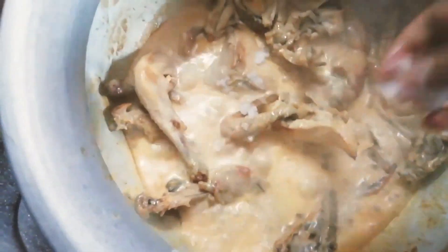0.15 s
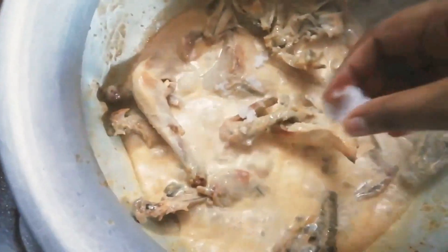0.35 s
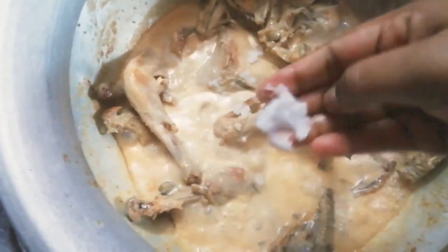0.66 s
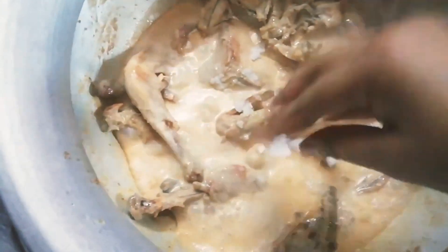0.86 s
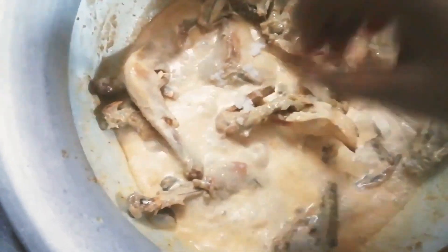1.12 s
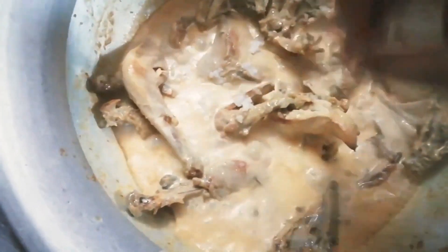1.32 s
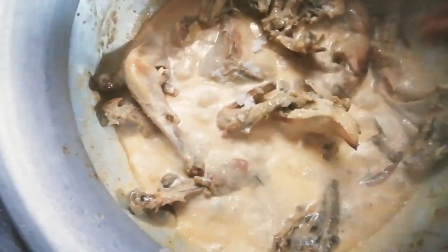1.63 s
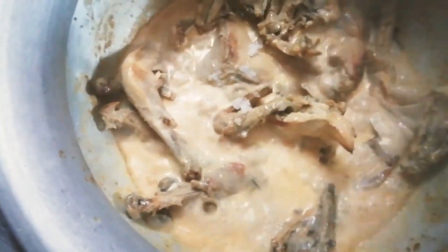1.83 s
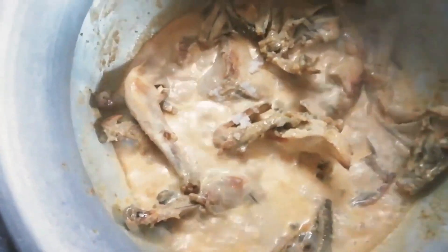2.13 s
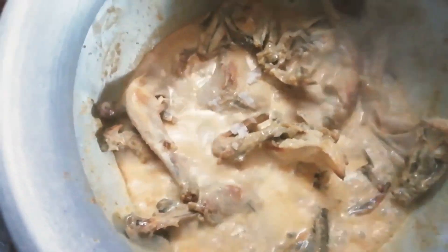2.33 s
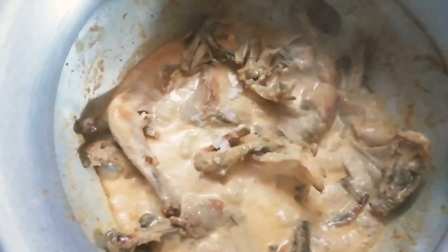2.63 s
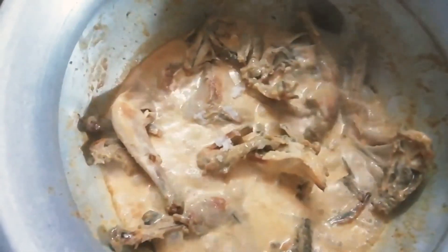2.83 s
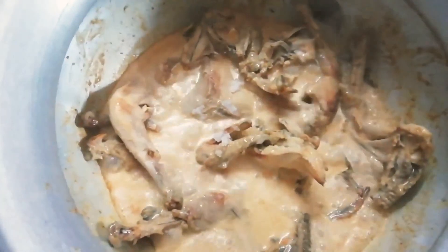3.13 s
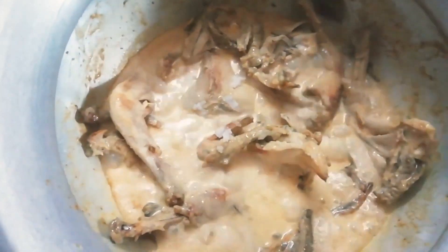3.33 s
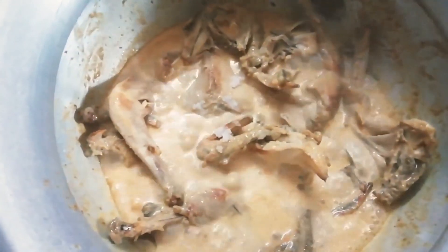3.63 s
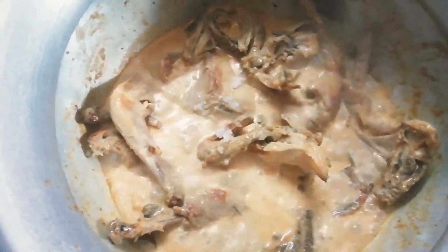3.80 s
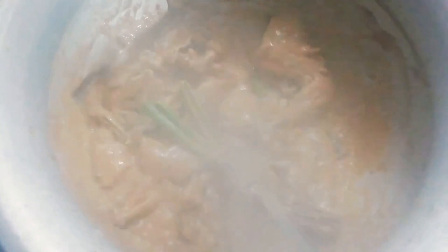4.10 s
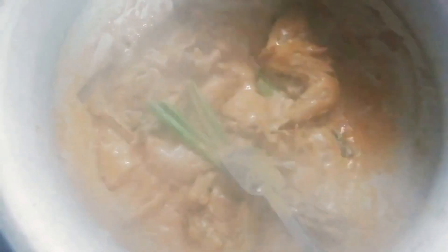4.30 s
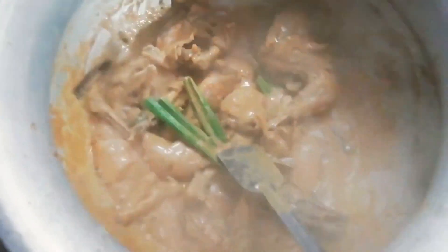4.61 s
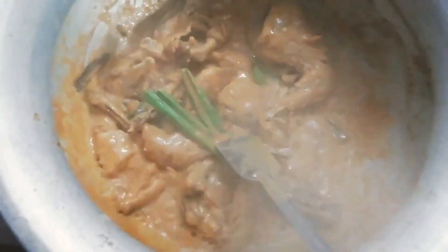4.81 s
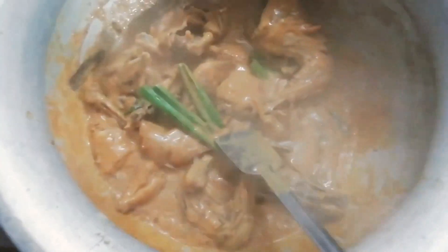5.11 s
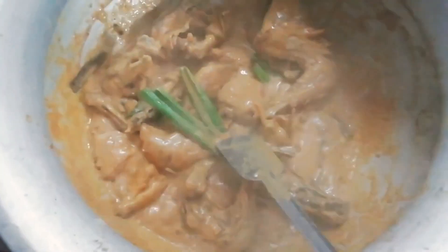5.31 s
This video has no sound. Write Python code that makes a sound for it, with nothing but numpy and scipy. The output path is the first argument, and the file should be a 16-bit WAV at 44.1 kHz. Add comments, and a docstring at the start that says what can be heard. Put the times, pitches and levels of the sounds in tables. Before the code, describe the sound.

Very close stereo sound of stew in a wide pot. First a quiet simmer, with rounded plops and pops rising in pitch, crackly bubble runs and sharp high spits over thin fizz. A short gap holds only faint insect whine and low room rumble. Then a soft thump and a hard boil, steady bright frying-like hiss with fewer distinct pops, until the end.

```python
"""Metal pot of thick gravy, two close microphones: bubbles pop and spit over fine fizz and burner roar.
The pot fades out for a moment, leaving centred night insects and room rumble; a low thump, then a hard boil.
Bursts are rising-pitch rings with a crack and noise splatter; splutters are runs of small rings.
Fizz is clumped random grains plus noise; roar, rumble and night are coloured noise with narrow lines."""
import sys
import numpy as np
from scipy import signal
from scipy.fft import rfft, irfft
from scipy.io import wavfile
from scipy.ndimage import uniform_filter1d, map_coordinates

SR = 44100
rng = np.random.default_rng(int(sys.argv[2]) if len(sys.argv) > 2 else 0)


def persist_wave(psi):
    """Save psi, clipped to +-1, as 16-bit WAV."""
    counts = np.round(np.clip(psi, -1, 1) * 32767).astype(np.int16)
    wavfile.write(sys.argv[1], SR, np.atleast_2d(counts).T)


N = 240481

# Night band spectrum: hz, density_db_per_hz (relative)
NIGHT_SPECTRUM = [(900, -60), (1500, -15.5), (3100, -17.5), (3600, -19.5), (5800, -22), (6500, -11.5),
                  (7300, 2), (7600, -4), (8900, -6), (9600, -16.5), (10800, -16), (11700, -25),
                  (15500, -24.5)]
# Room rumble spectrum: hz, density_db_per_hz (relative)
RUMBLE_SPECTRUM = [(12, -58), (20, -7), (91, -9), (129, -6.5), (151, -14.5), (354, -9.5), (481, -15.5),
                   (517, -11), (619, -19), (1500, -27.5), (1950, -78), (3300, -120)]
NIGHT_RMS_DB, RUMBLE_RMS_DB = -53, -58
# Insect lines: hz, width_hz, level_db
INSECT_LINES = [(7110, 7.9, -65.5), (7490, 39, -64.5)]
# Thin steady whine: hz, width_hz, level_db
WHINE_LINES = [(6002, 4, -80)]
# Appliance drone: hz, width_hz, level_db (relative to the drone's level)
DRONE_LINES = [(82.6, 21.4, -3), (122.9, 24, -4)]
# Drone swelling and sinking: time_s, level_db
DRONE_LEVELS = [(0, -58), (.23, -65.5), (.59, -55.5), (1.05, -60), (1.29, -61), (2.14, -55.5), (2.3, -67),
                (2.6, -54), (2.85, -78.5), (2.99, -55), (3.22, -65), (3.55, -54), (3.85, -65), (4.01, -58),
                (5.45, -64)]
# Low bumps as the hand-held microphones are jostled: start_s, peak_db, pitch_hz
JOSTLES = [(0.047, -47, 88.8), (0.139, -44, 56), (0.938, -44, 79.4), (1.941, -48, 63.5), (2.33, -48, 57.5),
           (2.411, -49, 37.7), (2.971, -43.5, 51.4), (3.5, -47, 71)]
THUMP_S, THUMP_DB, THUMP_SETTLE_S = 4.2078, -30.7, .036

# Simmer, then hard boil; fizz level in each: time_s, level_db
SPELL_LEVELS = [
    [(0, -52.5), (.45, -55), (1.35, -51.5), (1.43, -53), (1.5, -50.5), (1.6, -55), (1.9, -52),
     (1.97, -52.5), (2.1, -52.5), (2.6, -54.5), (3.89, -52)],
    [(4.208, -42), (4.266, -42.5), (4.35, -39), (4.41, -40.5), (4.49, -39), (4.56, -40), (4.91, -39.5),
     (4.98, -41.5), (5.09, -38.5), (5.21, -42), (5.24, -39), (5.34, -40.5), (5.453, -39.5)],
]
FADE_S, FADE_DB_PER_S = 3.885, 700  # simmer's fizz and roar fade from here
# Burner roar spectrum in each spell: hz, density_db_per_hz (relative)
ROAR_SPECTRA = [(12, -30), (20, 10), (86, -12), (128, -34), (151, 3.5), (251, 0.5), (295, 7.5), (577, -5),
                (640, -27), (700, -2.5), (910, -24), (1540, -120)], [(12, -43), (20, -18), (112, -19),
                (201, 1), (266, -5.5), (309, 2.5), (490, -7), (700, -25), (910, -38), (1540, -120)]
# Roar swelling with the gurgling: time_s, level_db
ROAR_LEVELS = [(0, -54.5), (.15, -57.5), (3.87, -54.5), (4.2, -54.5), (5.45, -54)]
# Fizz spectrum in each spell: hz, density_db_per_hz (relative)
FIZZ_SPECTRA = [(320, -71), (550, -14), (813, 3), (1050, -1.5), (1960, -5), (2350, -4.5), (5750, -5.5),
                (8150, 1.5), (9640, -5.5), (10300, -38), (10900, -27), (12200, -16), (13300, -23),
                (15500, -58)], [(320, -42), (550, -21), (660, -13.5), (791, -6.5), (1080, -16),
                (1380, -8.5), (1660, -10), (2290, -6.5), (4930, -6), (6520, -9), (7930, 1), (8860, -3.5),
                (10900, -18), (14500, -27.5), (15500, -50)]
GRAINS_PER_S, GRAIN_SPREAD_DB, CLUMP_DB = (2500, 6000), (1.5, 2), (4, 2.5)  # in each spell
# Left-right likeness of fizz and roar: hz, likeness (0 to 1)
LIKENESS = [(100, 0.96), (350, 0.96), (700, 0.059), (1400, 0.66), (2200, 0.072), (3000, 0.0081)]
# Left-right balance of fizz and roar: hz, left_right_db
BALANCE = [(60, 4), (110, 1), (200, -0.5), (380, -0.5), (700, 3.5), (1290, -1), (2380, 6), (4400, 1.5),
           (8120, -1), (15000, 3)]

# Ragged runs of small bubbles: start_s, length_s, pitch_hz, spread_octaves (each way), level_db, left_right_db
RUNS = [(0.031, 0.063, 1400, 1.05, -55, 2), (0.267, 0.02, 1190, 0.54, -57, 0),
        (0.745, 0.071, 1200, 0.76, -60, 3), (0.9, 0.087, 2780, 0.31, -59, 9),
        (1.058, 0.031, 2940, 0.22, -61, 17), (1.103, 0.02, 2500, 0.36, -57, 22),
        (1.268, 0.032, 2600, 0.98, -56, 4), (1.292, 0.062, 4600, 0.45, -56.5, 12),
        (1.313, 0.029, 2620, 0.53, -56, 16), (1.329, 0.013, 5500, 0.49, -54, 6),
        (1.354, .055, 2310, 0.86, -58, 3), (1.369, 0.0088, 4000, 0.49, -52, 3),
        (1.467, 0.061, 3100, 0.38, -55, 2), (1.497, .008, 3300, .03, -50, 10),
        (1.639, 0.056, 2540, 1.05, -56.5, 7), (1.936, 0.05, 2760, 0.92, -51, 8),
        (1.958, 0.011, 3040, 1.1, -52, 6), (1.969, 0.0087, 3450, 0.81, -53.5, 12),
        (2.072, 0.056, 1550, 0.88, -60.5, 2), (2.158, 0.012, 1720, 0.65, -50.5, 1),
        (2.496, .055, 2370, 0.21, -56, 7), (2.601, 0.048, 2320, 0.68, -59.5, 5),
        (2.806, 0.024, 2390, 1.73, -46, 2), (2.812, 0.0035, 4130, 1.3, -51, 2),
        (2.944, 0.0075, 3680, 0.32, -58, 8), (3.636, 0.04, 1800, 0.93, -52.5, -1),
        (3.655, 0.0037, 5500, 1.5, -50.5, 9), (3.769, 0.036, 1200, 0.67, -55, -3),
        (5.42, 0.03, 3030, 0.73, -54, 19)]
CLIMB = .35  # share of a run's pitch spread that climbs as the bubbles shrink
PLOP_HZ, PLOP_DB = 340, 9.5  # nominal pitch; peak over the run's level

# Clearest bursts: start_s, level_db, pitch_hz, left_right_db, splatter_db, crack_db (last two re level_db)
CLEAR_POPS = [(0.021, -35, 1480, 3, -15, -12), (0.042, -38.5, 1070, 4, -14, -18),
              (0.066, -40, 1480, 0, -16, -2), (0.129, -43, 1450, 1, -12, -15),
              (0.141, -34, 1520, 0, -10, -17), (0.2, -45, 1080, 4, -6, -14),
              (0.274, -42, 1390, 2, -12, -12), (0.297, -44.5, 2880, 10, -20, -1),
              (0.304, -46.5, 880, 1, -12, -12), (0.504, -46, 1230, 1, 4, -16),
              (0.58, -43, 1350, 1, -10, -16), (0.614, -52, 2000, 5, -7, 8), (0.617, -47, 3900, 1, -1, -6),
              (0.678, -51, 2570, 8, 1, 11), (0.693, -49, 2520, 4, -2, 7), (0.735, -45, 2700, 6, -18, -7),
              (0.812, -49, 990, 3, -8, -6), (0.719, -47, 1090, 4, -6, -2), (0.769, -48, 850, 2, -12, -8),
              (0.872, -46, 1140, 1, -21, -12), (0.906, -45.5, 2600, 1, -6, 10),
              (0.99, -34.5, 3570, 8.5, -5, -3), (0.9905, -34, 7700, -1, -1, -12),
              (0.9967, -33, 1390, 0, -15, -20), (1.0633, -37, 3080, 9, -13, -16),
              (1.0942, -34, 1820, -1, -9, -14), (1.1124, -23.5, 7490, 2, -6, -23),
              (1.113, -25.5, 4720, 9.5, -15, -12), (1.199, -43, 2340, 4, 0, -1),
              (1.213, -40, 6000, 5, -9, -7), (1.27, -42, 2710, 6, -17, -12), (1.2969, -46, 2610, 10, -9, 5),
              (1.297, -29, 7850, -3, -9, -7), (1.299, -45.5, 1360, 2, -10, -12),
              (1.31, -39, 8000, 0, -8, -12), (1.331, -34, 8100, -4, -2, -8), (1.354, -55, 1110, -2, 5, -4),
              (1.369, -55, 1310, 5, -10, 18), (1.396, -52, 3500, 4, -12, 8),
              (1.401, -44.5, 1810, 1, -10, 4), (1.488, -38, 7500, 2, -10, 2), (1.36, -42, 1770, -5, -5, 5),
              (1.389, -38, 1610, -1, -11, -2), (1.464, -39, 1410, 0, -2.5, 3), (1.469, -43, 3000, 8, -6, 3),
              (1.474, -30, 14500, 0, -20, -30), (1.475, -45.5, 1390, 6, -4, -8),
              (1.65, -41, 1330, 1, -2, 0), (1.672, -44, 4270, 3, -0.5, 4), (1.74, -42.5, 790, 5, -1.5, -5),
              (1.932, -38, 2270, 0, -1, 12.5), (2.007, -44, 4900, 3, -10, -7),
              (2.107, -46, 504, 3, -1, -17), (1.981, -48, 890, 8, -7, -10),
              (2.066, -45.5, 1040, 2, 4.5, -14), (2.17, -32, 3860, 6.5, -5, -16),
              (2.219, -46, 1580, 0, -5, 5), (2.231, -40.5, 3860, 2, -3, 6), (2.499, -47, 2200, 0, -26, 10),
              (2.723, -46.5, 1540, 4, -1, -12), (2.766, -43.5, 1610, 0, -22, -9),
              (2.795, -40, 900, -2, -5, -15), (2.806, -23.5, 3120, 9.5, -11.5, -8),
              (2.977, -39.5, 1970, 7, -7, -15), (3.131, -44, 1300, 0, -13, 3),
              (3.211, -42, 7600, -6, -3, -7), (3.271, -35.5, 3940, 2, -5.5, -0.5),
              (3.272, -37, 7940, 1, 0, -21), (3.324, -42, 1030, 2, 1, -7), (3.417, -33, 8000, -2, -16, -7),
              (3.637, -33.5, 1540, -7, -16, -21), (3.652, -42, 1390, 3.5, -1, -5),
              (3.7245, -29, 8600, 7, -7.5, -17), (3.857, -45, 4500, 3, -2, -8),
              (3.867, -34, 8100, -2, -5, -19), (4.2458, -37.5, 3580, 11, -13, -21),
              (4.3147, -25, 8050, -2.5, -22, -25), (4.343, -35.5, 2700, 4, -5, -15),
              (4.3668, -22.5, 7800, -9, -31, -16), (4.4972, -34, 7560, 2, -18, 4.5),
              (4.5487, -44.5, 1900, 11, 1, 5), (4.7723, -32.5, 4150, 5, -4.5, -1.5),
              (5.151, -31, 7950, 0, -2, -12), (5.2285, -28.5, 7830, 3, -9, -18),
              (5.274, -39.5, 2530, 5, -12, 7.5), (5.3928, -34.5, 2570, 5, -4, -19)]
# Small bursts in each spell: rate_per_s, low_hz, high_hz, level_db, spread_db (each way), mean left_right_db
SMALL_POP_RANGES = [(32, 675, 3600, -53.5, 7, 1.5), (70, 900, 5400, -50, 4, 3.5)]
SMALL_SPLATTER_DB, SMALL_CRACK_DB = -4, 1
# Pot wall echoes of each burst: delay_s, level_db
POT_ECHOES = [(.0025, -16), (.0045, -20)]
RISE_S = .0013  # first stir of a burst to the top of its blip
SPIT_HZ = 6600  # bursts above are spits of fat: longer ring, shorter splatter
PORT_HZ = 9300  # microphones lose treble above their port resonance; applied to bursts and runs
EDGE_HZ = 15430


def gain_of(db):
    """Amplitude ratio of a level in dB."""
    return 10 ** (np.asarray(db) / 20)


def unit_rms(x):
    """Scales x to rms 1."""
    return x / np.sqrt(np.mean(x ** 2) + 1e-20)


def add(mix, sound):
    """Adds sound at the head of mix, cut to fit."""
    count = min(mix.shape[-1], sound.shape[-1])
    mix[..., :count] += sound[..., :count]


def panned_gain(db, left_right_db):
    """Left and right gains, the dB difference split evenly."""
    return gain_of(db + np.array([[left_right_db], [-left_right_db]]) / 2)


def read(points, hz):
    """Interpolates a table over log frequency."""
    f, value = np.transpose(points)
    return np.interp(np.log(hz + 1), np.log(f + 1), value)


def coloured(x, points):
    """Filters x by the table's spectrum, at rms 1."""
    hz = np.fft.rfftfreq(x.shape[-1], 1 / SR)
    return unit_rms(irfft(rfft(x) * gain_of(read(points, hz)), x.shape[-1]))


def wander(knots_per_s, count):
    """Slow random curve of rms 1."""
    knots = rng.standard_normal(int(count / SR * knots_per_s) + 4)
    return unit_rms(map_coordinates(knots, [np.arange(count) / SR * knots_per_s], order=2))


def line(hz, width_hz):
    """Narrow wavering line of rms 1: a resonator on noise, shifted up to hz."""
    r = np.exp(-np.pi * width_hz / SR)
    noise = rng.standard_normal(N) + 1j * rng.standard_normal(N)
    slow = signal.lfilter([1], [1, -2 * r, r * r], noise)
    return unit_rms((slow * np.exp(2j * np.pi * hz * np.arange(N) / SR)).real)


def blip(hz, cycles, glide=0.093):
    """Bubble wall rings a few cycles, rising in pitch as the cavity opens; envelope peak 1."""
    u = np.arange(int(2.5 * cycles / hz * SR) + 2) / SR * hz / cycles
    envelope = (np.e * 3 * u * np.exp(-3 * u)) ** 3
    return envelope * np.sin(2 * np.pi * cycles * u * (1 - glide + glide * u))


def night():
    """Room rumble, appliance drone, whine and a far insect band with narrow wavering lines."""
    out = gain_of(NIGHT_RMS_DB) * coloured(rng.standard_normal(N), NIGHT_SPECTRUM)
    out += gain_of(RUMBLE_RMS_DB) * coloured(rng.standard_normal(N), RUMBLE_SPECTRUM)
    for hz, width_hz, db in INSECT_LINES + WHINE_LINES:
        out += gain_of(db + 2.0 * wander(3.36, N)) * line(hz, width_hz)
    drone = sum(gain_of(db) * line(hz, width_hz) for hz, width_hz, db in DRONE_LINES)
    drone_db = np.interp(np.arange(N) / SR, *np.transpose(DRONE_LEVELS))
    return out + gain_of(drone_db) * drone


def bumps():
    """Each jostle swings both microphones a few slow cycles."""
    out = np.zeros(N)
    for s, db, hz in JOSTLES:
        add(out[round(s * SR):], gain_of(db) * blip(hz, 1.95))
    return out


def thump():
    """As the boil comes in, the microphone line jumps low and settles back."""
    t = np.maximum(np.arange(N) / SR - THUMP_S, 0)
    u = t / THUMP_SETTLE_S
    return -gain_of(THUMP_DB) * np.minimum(t / .0012, 1) * (1 + u) * np.exp(-u)


def burner_roar(at, spectrum):
    """Flame turbulence: coloured noise swelling with the gurgling, with a random flutter."""
    noise = coloured(rng.standard_normal((2, len(at))), spectrum)
    level_db = np.interp(at / SR, *np.transpose(ROAR_LEVELS))
    return noise * gain_of(level_db + 2.04 * wander(20, len(at)))


def fizz(count, spectrum, per_s, spread_db, clump_db):
    """Countless tiny clumped bursts of all pitches, each reaching the microphones by its own path."""
    size = gain_of(spread_db * np.minimum(rng.exponential(1, count), 4))
    size *= rng.random(count) < per_s / SR
    size *= gain_of(0.4 * clump_db * wander(40, count))  # whole surface seethes in surges
    pitches_hz = np.geomspace(600, 14000, num=30)
    # neighbouring pitches, five to a group, clump together
    clumps = [gain_of(clump_db * wander(45, count)) for size_class in range(6)]
    kind = rng.integers(0, len(pitches_hz), count)
    out = np.zeros((2, count))
    for k, hz in enumerate(pitches_hz):
        grain = blip(hz, 5.4)
        grain = grain * np.sqrt(hz) / np.linalg.norm(grain)
        right_lag = rng.integers(0, 60)  # samples
        train = signal.oaconvolve(size * clumps[k // 5] * (kind == k), grain)[:count]
        out += [train, np.roll(train, right_lag) * (-1) ** k]
    flat = rfft(out)
    flat /= np.sqrt(uniform_filter1d(abs(flat) ** 2, size=count // 200))  # levels the grains' own spectrum
    mist = rng.standard_normal((2, count))  # bursts too small and many to tell apart
    return coloured(0.73 * unit_rms(irfft(flat, count)) + 0.64 * mist, spectrum)


def spells():
    """Fizz and burner roar through simmer and boil, silent between after the fade."""
    out = np.zeros((2, N))
    settings = zip(SPELL_LEVELS, ROAR_SPECTRA, FIZZ_SPECTRA, GRAINS_PER_S, GRAIN_SPREAD_DB, CLUMP_DB)
    for levels, roar_spectrum, *texture in settings:
        s, fizz_db = np.transpose(levels)
        at = np.arange(round(s[0] * SR), min(round((s[-1] + .1) * SR), N))
        roar = burner_roar(at, roar_spectrum)
        out[:, at] += gain_of(np.interp(at / SR, s, fizz_db)) * fizz(len(at), *texture) + roar
    t = np.arange(N) / SR
    fade = gain_of(-FADE_DB_PER_S * np.maximum(t - FADE_S, 0))
    return out * np.where(t < SPELL_LEVELS[1][0][0], fade, 1)


def ports(x):
    """Close microphones hear long waves alike; the pot stands a little to the left."""
    hz = np.fft.rfftfreq(N, 1 / SR)
    left, other = rfft(x)
    same = np.clip(read(LIKENESS, hz), 0, 1)
    lean = gain_of(read(BALANCE, hz) / 2)
    right = same * left + np.sqrt(1 - same ** 2) * other
    return irfft([left * lean, right / lean], N)


def splutters(per_s):
    """Steam escapes thick gravy in quick runs of small bubbles; each starts with a slump into the hole."""
    out = np.zeros((2, N))
    for s, length_s, hz, octaves, db, left_right_db in RUNS:
        run = np.zeros((2, round(length_s * SR) + 400))
        for when, pitch, lag, size in rng.random((160, 4))[:max(round(per_s * length_s), 3)]:
            position = CLIMB * when + (1 - CLIMB) * pitch
            ratio = 2 ** (octaves * (2 * position - 1))
            ring = blip(hz * ratio, 5.5) * np.sqrt(ratio) * gain_of(-4 * when + 9 * size ** 2)
            at = round(when * length_s * SR)
            add(run[0, at:], ring)
            add(run[1, at + round(lag * 30):], ring)
        start = round(s * SR)
        add(out[:, start:], panned_gain(db, left_right_db) * unit_rms(run))
        plop = blip(PLOP_HZ * rng.uniform(0.76, 1.1), 1.9)
        add(out[:, start:], gain_of(db + PLOP_DB) * plop)
    return out


def small_pops():
    """Rows for faint bursts at random times, pitches and levels through each spell."""
    rows = []
    for spell, ranges in zip(SPELL_LEVELS, SMALL_POP_RANGES):
        per_s, low_hz, high_hz, db, spread_db, left_right_db = ranges
        start_s, span_s = spell[0][0], spell[-1][0] - spell[0][0]
        for when, pitch, size, side in rng.random((160, 4))[:round(per_s * span_s)]:
            level_db = db + spread_db * (2 * size - 1)
            pitch_hz = low_hz * (high_hz / low_hz) ** pitch
            rows.append((start_s + when * span_s, level_db, pitch_hz,
                         2 * left_right_db * side, SMALL_SPLATTER_DB, SMALL_CRACK_DB))
    return rows


def bursts(rows, cycles, splatter_s, splatter_width, right_lag):
    """Skin cracks, cavity rings, droplets splatter around its pitch; right_lag in samples delays the ring."""
    out = np.zeros((2, N + SR))
    t = np.arange(2200) / SR
    u = t[:40] / .00006
    for s, db, hz, left_right_db, splatter_db, crack_db in rows:
        noise = rng.standard_normal((2, len(t))) * gain_of(2 * wander(380, len(t)))
        edges_hz = np.clip([hz / splatter_width, hz * splatter_width], 100, SR / 2.2)
        band = signal.butter(2, edges_hz, "band", fs=SR, output="sos")
        splatter = unit_rms(signal.sosfilt(band, noise))
        sound = gain_of(splatter_db) * splatter * np.exp(-t / splatter_s) * np.minimum(t / .002, 1)
        ring = np.zeros(len(t))
        ring_start_s = RISE_S - cycles / hz / 3  # the blip tops out a third of its cycles in
        add(ring[max(round(ring_start_s * SR), 0):], blip(hz, cycles))
        crack = 4 * u * (2 - u) * np.exp(-u)  # the skin tears
        add(ring[round(RISE_S * SR):], gain_of(crack_db) * crack)
        for delay_s, echo_db in POT_ECHOES:
            ring = ring - gain_of(echo_db) * np.roll(ring, round(delay_s * SR))
        sound += [ring, np.roll(ring, right_lag)]
        add(out[:, round(s * SR):], panned_gain(db, left_right_db) * sound)
    return out[:, :N]


def scene():
    """Sums pot, night, bumps and thump; bursts and runs pass the port rolloff."""
    rows = CLEAR_POPS + small_pops()
    pop_rows = [row for row in rows if row[2] < SPIT_HZ]
    spit_rows = [row for row in rows if row[2] > SPIT_HZ]
    pops = bursts(pop_rows, cycles=6.6, splatter_s=.006, splatter_width=1.3, right_lag=4)
    spits = bursts(spit_rows, cycles=9.5, splatter_s=.004, splatter_width=1.25, right_lag=-6)
    near = signal.lfilter(*signal.butter(2, PORT_HZ, fs=SR), pops + spits + splutters(per_s=1800))
    return ports(spells()) + near + night() + bumps() + thump()


def record(dry):
    """Band limit: steep linear-phase lowpass."""
    lowpass = signal.firwin(1023, EDGE_HZ, window=("kaiser", 9), fs=SR)
    return signal.oaconvolve(dry, lowpass[None], "same")


dry = scene()
out = record(dry)
persist_wave(out)
```